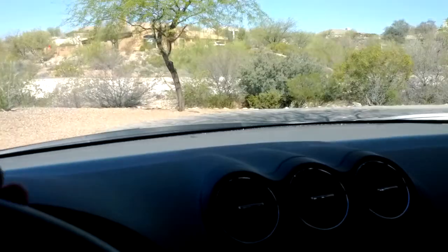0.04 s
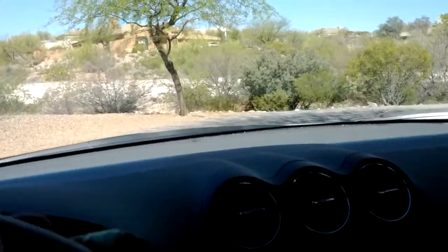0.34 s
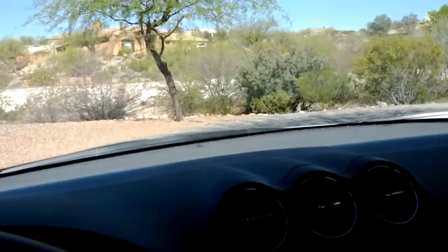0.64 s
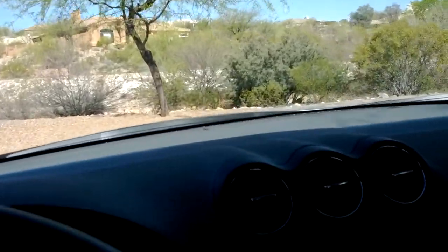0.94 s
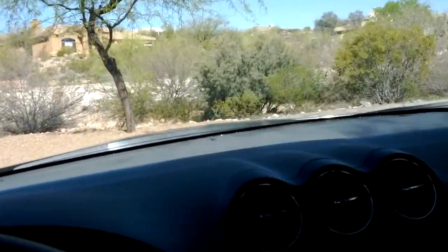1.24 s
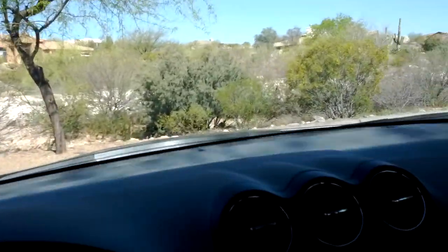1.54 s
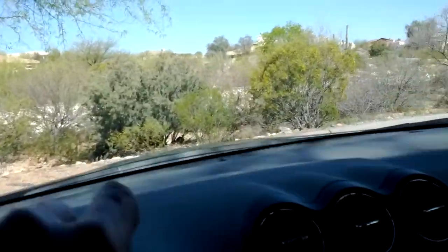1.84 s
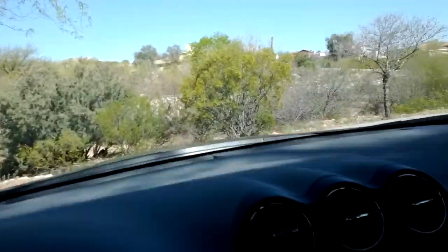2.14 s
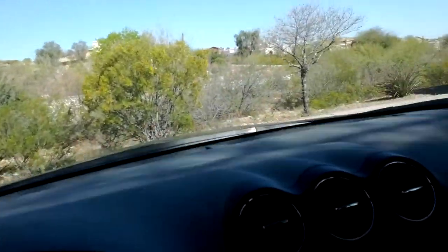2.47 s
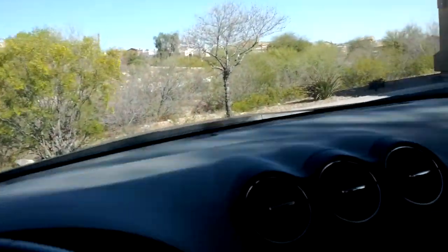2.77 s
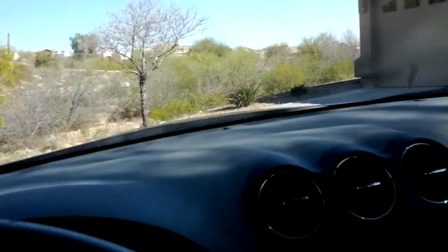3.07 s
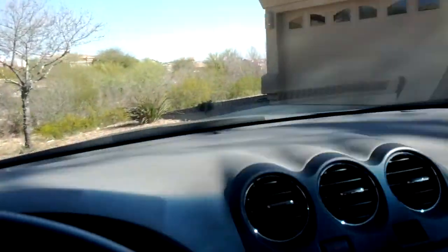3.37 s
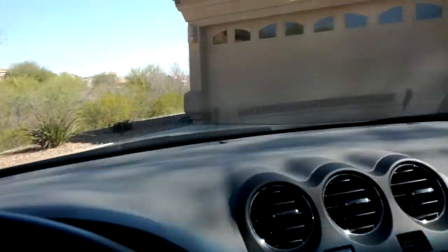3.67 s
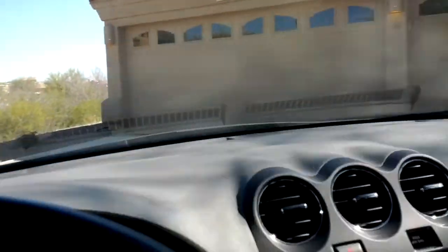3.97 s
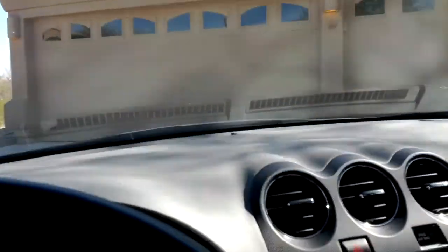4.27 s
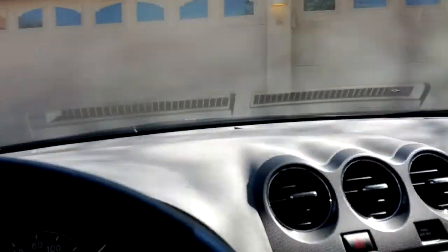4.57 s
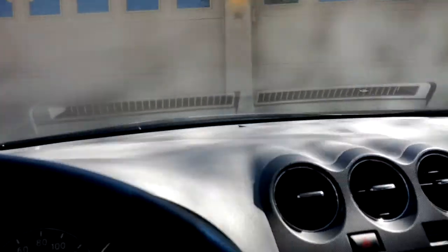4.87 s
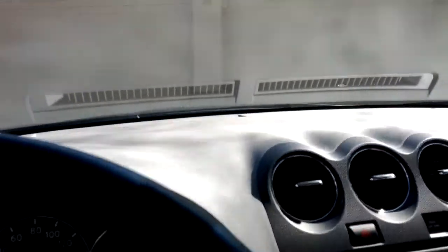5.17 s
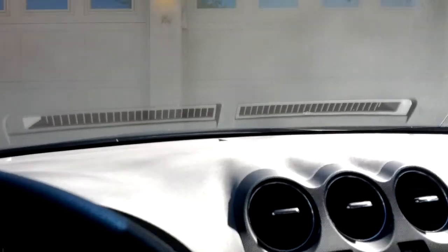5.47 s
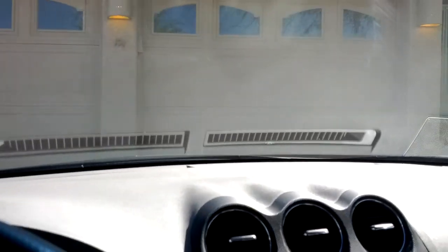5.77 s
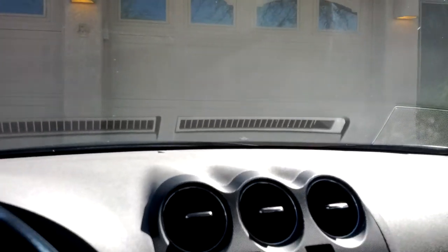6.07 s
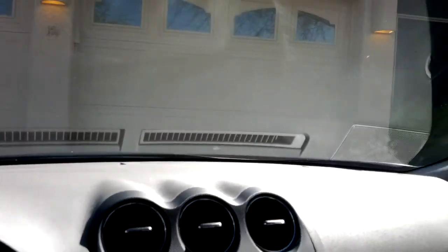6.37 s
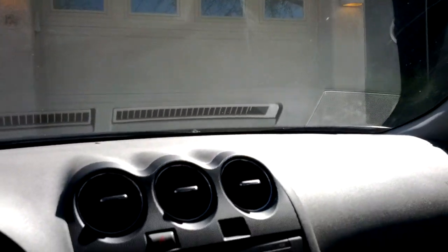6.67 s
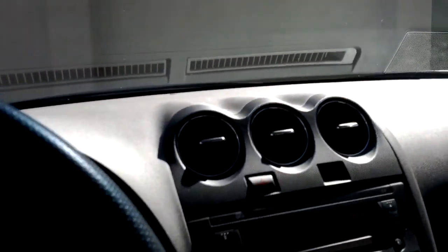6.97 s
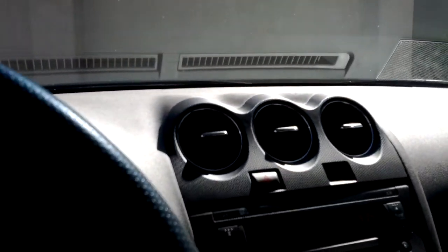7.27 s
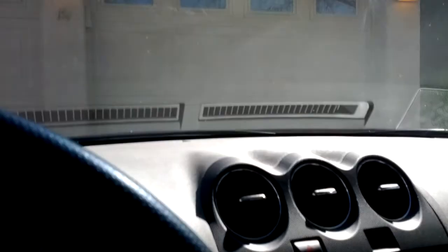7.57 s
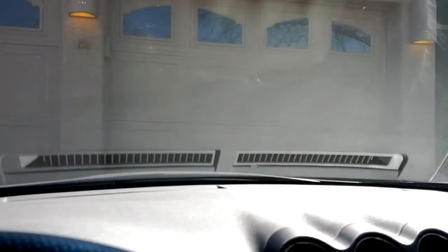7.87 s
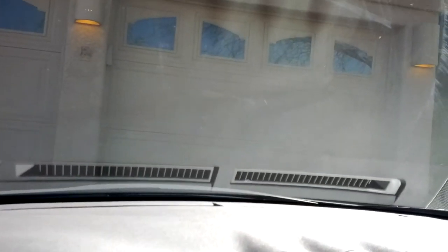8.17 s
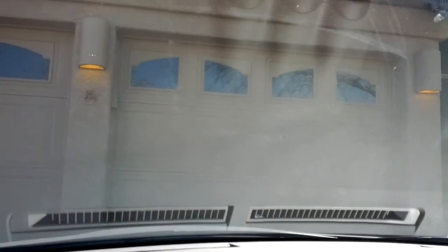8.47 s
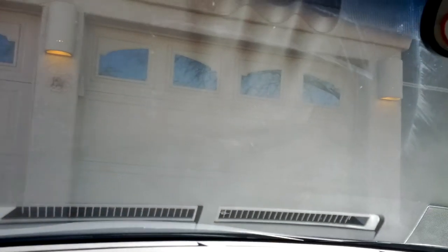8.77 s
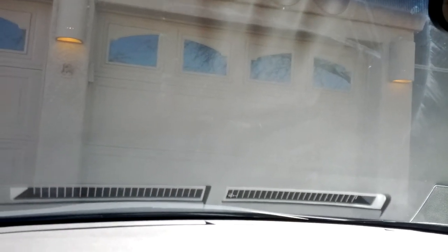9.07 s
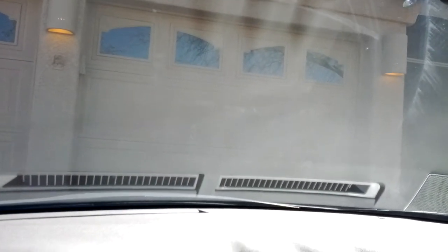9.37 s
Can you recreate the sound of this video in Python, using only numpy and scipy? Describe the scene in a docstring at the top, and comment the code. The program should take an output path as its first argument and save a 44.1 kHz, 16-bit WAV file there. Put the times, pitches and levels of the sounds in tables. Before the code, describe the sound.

A car engine drones inside the cabin and settles to idle, then a seat belt clicks and retracts and the parking brake ratchets.

```python
"""A four-cylinder engine drones and settles to idle, heard inside a car rolling up a driveway to a stop.
Its firing pulses boom in the cabin, tyres shake the body, the steering wheel rubs through a palm.
A seat belt clicks open and reels in until its steel tongue hits the pillar; the gear lever knocks the
trim and the parking brake's pawl ratchets up. Sleeves swish, and fingers shift on a hand-held phone."""
import sys
import numpy as np
from scipy import signal
from scipy.fft import rfft, irfft, next_fast_len
from scipy.io import wavfile
from scipy.ndimage import uniform_filter1d, map_coordinates

SR = 44100
rng = np.random.default_rng(int(sys.argv[2]) if len(sys.argv) > 2 else 0)


def store_wav(level_fs):
    """Save 16-bit WAV to argv[1]."""
    pcm = np.round(np.clip(np.atleast_2d(level_fs), -1, 1) * 32767)
    wavfile.write(sys.argv[1], SR, pcm.T.astype(np.int16))


N = 424241
T = np.arange(N) / SR

# engine pitch (time [s], firing rate [Hz])
FIRING = [(0, 28.07), (.6, 26.55), (1.15, 27.32), (1.65, 34.4), (1.95, 38.46), (2.3, 41.22), (2.8, 36.22),
          (3.12, 41.65), (3.7, 37.2), (4, 36.25), (4.55, 32.7), (5.1, 26.51), (5.8, 25.94), (6.7, 24.18),
          (7.4, 25.48), (8.4, 23.69), (8.8, 24.42), (9.62, 26.54)]
# the firing tone eases down to idle (time [s], level [dB])
DRONE = [(0, -30), (.25, -29.5), (.7, -36), (1, -32.5), (1.6, -31), (2.3, -31.5), (2.7, -32), (3.15, -35),
         (4, -32), (4.85, -36.5), (5.6, -36.5), (7.3, -38.5), (8.6, -40), (9.62, -43.5)]
# engine harmonics (multiple of the firing rate, gain [dB])
ORDERS = [(1, 2), (2, -7), (3, -14.5), (4, -17.5), (5, -33), (6, -24.5)]

# latch and trim clicks (time [s], snap [dB], plastic ring [dB], t60 [s])
CLICKS = [(0.048, -47, -75.5, 0.046), (.073, -48, -70, .015), (0.106, -45, -67, 0.019),
          (.122, -48, -70, .015), (.147, -41, -70, 0.016), (1.552, -42, -71, 0.13),
          (4.84, -52, -47.5, 0.12), (5.153, -67, -39.5, 0.042), (5.36, -27, -37, 0.11),
          (5.369, -22, -32, 0.067), (5.402, -42, -58, 0.065), (5.451, -32.5, -64, 0.077),
          (5.473, -53, -42.5, 0.3), (5.488, -15, -26.5, 0.084), (5.501, -44, -42, 0.12),
          (6.032, -38.5, -34, 0.028), (6.335, -56, -38.5, 0.027), (6.395, -38, -49, .06),
          (6.4325, -39, -35, 0.031), (6.456, -40, -63, 0.036), (6.823, -52, -56, 0.082),
          (7.016, -46.5, -59, 0.17), (7.3603, -26, -35, 0.022), (7.4078, -26, -23, 0.0029),
          (7.425, -38, -50, 0.14), (7.576, -42, -47, 0.16), (7.993, -40.5, -36.5, 0.05),
          (8.065, -45.5, -59, 0.14), (8.209, -31, -34, 0.032), (8.391, -31, -30, 0.097),
          (8.407, -24, -29, 0.039), (8.493, -54, -45.5, 0.13), (8.634, -38, -38.5, 0.079),
          (9.19, -57, -51, .05), (9.435, -50, -49.5, 0.12)]
# a click's bright edge (frequency [Hz], gain [dB])
SNAP_EQ = [(600, -4), (1500, -3.5), (3000, 0.5), (4800, 5), (6500, -2), (9000, 5), (13000, 2.5),
           (16000, -5.5)]
# buckle, plastic shell and belt guide loop (frequency [Hz], width [Hz], gain [dB])
BUCKLE_PEAKS = [(3020, 40, -6), (4860, 70, 2), (5240, 50, -3), (7860, 120, -5), (8182, 90, 1),
                (8807, 60, 3), (9590, 70, 4), (10474, 60, -3), (11120, 500, -4), (13460, 150, -4)]
PLASTIC_PEAKS = [(1133, 62, 10), (1280, 110, 3), (1560, 95, 1.5), (2258, 26, 1), (2605, 44, -2.5),
                 (2925, 120, -2.5)]
GUIDE_PEAKS = [(3200, 200, -9), (4340, 700, 3), (4840, 350, 1), (5700, 460, -5), (10100, 150, -5),
               (10800, 750, 0), (11600, 350, 1)]
# the belt's sprung latch and steel tongue (frequency [Hz], gain [dB], t60 [s])
LATCH_MODES = [(1144, 4, 0.1), (1744, -15, 0.07), (2050, -4.5, 0.064), (2960, -6, 0.1), (3340, -9, 0.06),
               (4151, -7, 0.07), (4850, 0, 0.055), (5216, -3, 0.06)]
TONGUE_MODES = [(3020, 6.5, 0.12), (3015, -3, 0.31), (4900, 0, 0.15), (5060, 5.5, 0.13), (5300, -9, .12),
                (5520, 7, 0.077), (5800, -3, .16), (7445, -12, 0.26)]
# hits that ring them (time [s], level [dB], share of free ring time)
LATCH_HITS = [(5.37, -29, 0.56), (5.49, -27.5, 1)]
TONGUE_HITS = [(5.493, -53, 0.71), (6.4328, -38, 0.17), (6.442, -47, 0.13), (6.455, -47.5, 0.96),
               (6.485, -55, 0.65), (6.549, -62, 0.93), (6.824, -54.5, 0.5), (6.833, -60, 0.47)]
# webbing running into its reel (time [s], level [dB])
REEL = [(5.51, -50), (5.66, -53), (5.83, -47), (5.98, -51.5), (6.1, -42.5), (6.19, -55.5), (6.28, -50),
        (6.31, -57), (6.41, -49), (6.46, -36)]
# the webbing's hiss (frequency [Hz], gain [dB])
WEBBING_EQ = [(530, -33.5), (900, -32), (1150, -11), (1510, -5), (1790, -2.5), (3590, -1), (4150, -1.5),
              (7140, -6.5), (10200, -5.5), (13800, -7.5), (16000, -15)]

# hits on pillar, console and gear lever
# (time [s], low thump [dB], mid body [dB], upper clack [dB], crack [dB], crack t60 [s])
KNOCKS = [(1.957, -43, -85, -27.5, -48.5, 0.077), (2.687, -24.5, -57, -38, -42, 0.058),
          (4.61, -57, -47, -36.5, -45.5, 0.05), (5.497, -78, -30, -52, -55, .05),
          (5.792, -57, -46, -41, -59, .025), (6.100, -27, -17.5, -43, -31.5, 0.053),
          (6.118, -30, -46, -45, -47, 0.071), (6.455, -32, -11.5, -9.5, -18, 0.051),
          (6.4656, -34, -30, -13.5, -34, .025), (6.485, -43, -40, -42, -52, .04),
          (6.522, -53, -40, -52, -43, 0.027), (6.549, -50, -47, -48, -40, 0.044),
          (6.723, -56, -50, -38.5, -52, 0.027), (6.844, -53, -43, -36, -37, 0.014),
          (6.982, -58, -46.5, -35.5, -45.5, 0.022), (7.226, -54, -43, -39, -38, 0.011),
          (7.3, -39, -30.5, -37, -34.5, 0.13), (7.359, -21, -15.5, -23.5, -28.5, 0.05),
          (7.377, -31.5, -34, -53, -58, 0.032), (7.443, -35, -37, -63, -56, .03),
          (7.486, -47, -34.5, -39, -49, 0.1), (7.513, -62, -42, -38, -41, 0.044),
          (7.526, -60, -38, -31, -42, 0.016), (7.5476, -34, -20, -19.5, -19.5, 0.011),
          (8.638, -31.5, -46, -65, -44, 0.054)]
# console and trim panels (frequency [Hz], gain [dB], t60 [s])
TRIM_MODES = [(104.6, 3.5, 0.17), (124, 2, 0.044), (178, 7.5, 0.083), (197, -6, 0.042), (235, 3, 0.042),
              (258, 5, 0.03), (308, -9, 0.081), (368.5, 3.5, 0.053), (475, -3, 0.067), (511, -3.5, 0.052),
              (575, 1, 0.024), (661, -1.5, 0.035), (755, -18, 0.028), (936, -9.5, 0.041), (1000, -9, 0.018),
              (1685, -10, 0.011)]
# a knock's noisy attack (frequency [Hz], gain [dB])
CRACK_EQ = [(500, 9), (900, 0), (1800, 4.5), (3000, -4.5), (4000, -3), (5500, -14.5), (7500, -24),
            (11000, -10), (16000, -30)]
# first contact of the hardest hits (time [s], peak [dB], contact [s])
SLAPS = [(6.4559, -11, 0.0005), (7.3612, -24, 0.00085), (7.5485, -15.5, 0.00022)]

# the brake pawl drops over each tooth (time [s], rasp [dB], clean ring [dB], ring pitch [Hz])
TEETH = [(8.139, -52, -51, 1200), (8.171, -38, -34.5, 1193), (8.199, -44, -38, 1227),
         (8.209, -43, -28.5, 1213), (8.215, -48, -30.5, 1240), (8.257, -38, -38, 1210),
         (8.266, -34, -31, 1190), (8.286, -33, -42, 1230), (8.3, -29, -36, 1030), (8.309, -32.5, -33, 1350),
         (8.355, -29.5, -30, 1290), (8.361, -34, -39, 1290), (8.376, -31.5, -30, 1270),
         (8.387, -30, -44, 1270), (8.398, -25, -29, 1030), (8.408, -28, -27.5, 1008),
         (8.42, -51, -40, 1300)]
# the pawl's rasp (frequency [Hz], width [Hz], gain [dB])
PAWL_PEAKS = [(980, 23, 7), (1250, 46, -5), (1370, 90, 1.5), (1450, 130, 0), (1980, 610, -2.5),
              (2650, 640, -4), (3530, 300, -3), (4540, 210, -29)]
# ratchet and pawl spring (frequency [Hz], gain [dB], t60 [s])
RATCHET_MODES = [(1040, -16, 0.074), (1242, 3, 0.058), (1290, -23, 0.041), (1534, -7.5, 0.039),
                 (2580, -16, .035), (3670, -15, .05), (4510, -7, 0.023), (4730, -20, 0.024)]
SPRING_MODES = [(1570, -3, .04), (4150, -7, .035), (4530, 1, 0.045), (4830, 2, .035), (5050, -8, .03)]
# the lever crunches as the cable goes taut (time [s], level [dB], rise [s], t60 [s])
CRUNCHES = [(8.303, -35.5, 0.017, .12), (8.383, -30.5, 0.0071, 0.095), (8.405, -29, 0.01, 0.053)]
# heaves of the lever in the floor tunnel, then of the seat (time [s], length [s], level [dB])
HEAVES = [(8.195, 0.236, -29.5), (8.485, 0.049, -34), (8.615, 0.098, -35.5)]
# lever crunch and tunnel rumble (frequency [Hz], gain [dB])
CRUNCH_EQ = [(150, -5), (350, 6), (520, -3), (720, 3), (1020, -11), (1200, -8), (2000, -13), (4000, -27),
             (8000, -40)]
TUNNEL_EQ = [(35, -22), (75, 1), (110, 2), (165, -1), (210, -7.5), (320, -10.5), (480, -29), (700, -33),
             (1200, -47)]

# the wheel slides through the palm (time [s], length [s], rub [dB], low ring [dB], high ring [dB])
SLIDES = [(0.283, 0.079, -66.5, -63, -90), (0.508, 0.052, -55, -67, -82), (0.555, 0.04, -46.5, -61, -84),
          (0.635, 0.32, -57.5, -60, -81), (0.88, 0.18, -72.5, -68, -83), (1.076, 0.1, -53, -65, -64),
          (1.165, 0.078, -52, -57, -58.5), (1.245, 0.35, -59, -72, -86), (1.595, .18, -59.5, -68, -89),
          (1.428, 0.03, -52, -55, -70), (1.897, 0.021, -58, -58, -64), (1.95, 0.024, -76, -41, -57),
          (2.024, 0.12, -56.5, -67, -73), (2.152, 0.044, -50.5, -58, -68), (2.189, 0.072, -42, -48.5, -62),
          (2.27, 0.062, -54, -50.5, -74), (2.345, 0.078, -47, -47.5, -55.5),
          (2.415, 0.073, -44.5, -44.5, -54), (2.49, 0.1, -43, -48, -53), (2.614, 0.023, -41, -54, -52),
          (2.662, 0.032, -42.5, -47, -54), (2.717, 0.057, -53, -53, -63), (3.098, 0.077, -65, -66, -76),
          (3.329, 0.027, -86, -56, -69), (3.456, 0.055, -58.5, -60, -61), (3.577, 0.093, -57.5, -58, -61.5),
          (3.931, 0.077, -79, -53, -57), (3.991, 0.29, -54.5, -51.5, -51), (4.196, 0.042, -43, -59, -48),
          (4.297, 0.19, -68, -64, -91)]
# the palm hops over the rim's stitching (time [s], level [dB])
HOPS = [(3.616, -62), (3.639, -54), (3.665, -49), (3.708, -46.5), (3.723, -48.5), (3.784, -51), (3.93, -55),
        (3.953, -51), (4, -43.5), (4.058, -42), (4.179, -42)]
# the tightest grips creak (time [s], length [s], slip rate [Hz], level [dB])
CREAKS = [(2.382, 0.063, 198, -47.5), (2.432, 0.031, 212.5, -38), (2.604, 0.072, 149.4, -44.5),
          (2.674, 0.034, 170, -42)]
# the wheel's ring under slides and creaks (frequency [Hz], width [Hz], gain [dB])
WHEEL_LOW_PEAKS = [(458, 86, -14), (657, 28, 2.5)]
WHEEL_HIGH_PEAKS = [(996, 46, 5.5), (1470.7, 190, -5.5), (1800, 200, 0), (2730, 590, 5)]
CREAK_PEAKS = [(496, 42, 4), (656, 36, 7), (1240, 380, -8), (1900, 240, -15)]
# sleeve moves (time [s], length [s], hiss [dB], dull rustle [dB])
SWISHES = [(.06, 0.082, -77, -66), (0.656, 0.28, -56.5, -59), (2.795, 0.21, -45.5, -59),
           (4.603, 0.22, -47, -63), (4.783, 0.12, -49, -70), (4.737, 0.71, -60, -89),
           (6.252, 0.045, -45, -65), (6.41, 0.26, -61, -50.5), (6.544, 0.32, -64.5, -79),
           (6.39, 2.4, -66.5, -68), (7.265, 0.25, -54, -51), (7.452, 0.083, -57, -46.5),
           (8.079, 0.22, -58.5, -57), (8.458, 0.5, -52.5, -47.5), (8.758, 0.21, -49, -49.5),
           (8.9, 0.25, -55.5, -50.5), (8.781, 1.44, -65, -57.5)]
# fingers shift on the phone (time [s], level [dB], rise [s], t60 [s])
GRASPS = [(9.551, -37, 0.0047, 0.2), (9.575, -25.5, 0.0025, 0.06), (9.6, -24.5, 0.0092, 0.13)]
# friction of rim, sleeve and fingers (frequency [Hz], gain [dB])
RIM_EQ = [(300, -12), (600, 8), (1200, 0.5), (2000, -3), (3500, 0), (5200, 2.5), (6500, -13),
          (10000, -13.5), (16000, -19)]
CLOTH_EQ = [(1000, -5), (3000, 2), (5000, 1), (7000, -6), (10000, 2.5), (13000, 3), (16000, -6)]
FINGER_EQ = [(80, -8), (200, 1), (380, 2), (650, -6.5), (900, -6.5), (1400, -8.5), (2500, -16),
             (5000, -19.5), (7000, -27), (11000, -17), (16000, -28)]
# flickering bands of skin and cloth (frequency [Hz])
GRAIN_BANDS = [2400, 3500, 4900, 10500]

# soft jolts of car body and hand (time [s], pitch [Hz], level [dB], rise [s], t60 [s])
JOLTS = [(.1, 42.1, -17, 0.026, 1), (.17, 128.7, -28.5, 0.068, 0.35), (.85, 124.1, -31, 0.052, 0.72),
         (.99, 130, -34, 0.014, .4), (1.17, 108, -31, 0.042, 0.38), (1.55, 107, -36, 0.038, .5),
         (2.2, 192.8, -37, .025, .15), (2.775, 182, -32.5, 0.0096, 0.13), (.9, 82.5, -47, 0.075, 0.6),
         (2.47, 68, -26, .025, 0.15), (2.776, 91.4, -14, 0.0188, 0.23), (5.505, 118, -25, 0.021, 0.3),
         (7.358, 65.7, -11.5, 0.0028, 0.076), (8.388, 148, -17, 0.019, 0.05),
         (8.68, 151.4, -31.5, 0.013, 0.31)]
# swells and dips in the low rumble while the car rolls (centre time [s], half width [s], gain [dB])
RUMBLE_SWINGS = [(.2, 0.075, 8.5), (1.01, 0.1, 8), (1.58, 0.023, 6), (1.8, 0.072, 5.5), (1.91, 0.018, 3.5),
                 (2.05, .035, 0), (2.25, 0.05, 1), (2.51, 0.047, 4), (2.77, 0.21, 5.5), (3.1, .04, -2),
                 (3.25, 0.027, 6.5), (3.39, 0.049, 8.5), (3.69, 0.026, 7.5), (3.97, .04, 2.5)]
# fader ride for the body's boom (time [s], level [dB])
BOOM_RIDE = [(0, -45), (1.4, -44), (2.6, -43.5), (3.2, -47), (4.4, -46.5), (4.85, -53), (5.3, -49),
             (9.62, -51)]
# a faint high hiss, quieter until it rises near 4.6 s (time [s], level [dB])
HISS_RIDE = [(0, -79), (4.4, -80), (4.9, -68.5), (9.62, -75.5)]
# low, middle and top of the cabin bed (frequency [Hz], gain [dB])
BOOM_EQ = [(15, 4), (28, 7.5), (42, 8.5), (58, 4), (85, 4), (112, 10), (138, 2), (175, -9), (240, -18),
           (400, -76)]
ROAR_EQ = [(100, -31.5), (200, 2), (300, 3.5), (420, -1), (670, -1), (900, -8), (1400, -12.5),
           (2200, -22.5), (5000, -30), (9000, -95)]
HISS_EQ = [(800, 15), (2000, -19), (4000, -6), (5500, -45), (7000, -32), (10000, 14), (13000, 12.5),
           (16000, 5)]


def engine():
    """Firing harmonics boom in the cabin and beat against the swaying body; the cooling fan hums along."""
    sway_hz, fan_hz = 30.9, 133
    rolling = np.interp(T, [4.3, 5.1], [1, 0])
    phase = phase_of(curve(FIRING) * (1 + .0074 * walk(10)))
    phase += .31 * rolling * walk(20)  # under way the drone stumbles with the shaking body
    stumble_db = rolling * (3.5 * np.tanh(walk(13)) - 3)
    drone_db = curve(DRONE) + rumble_swing() + stumble_db
    upper_db = -37.5 + .064 * (drone_db + 35)  # upper harmonics barely follow the load
    drone = np.zeros(N)
    for order, db in ORDERS:
        ride_db = drone_db if order == 1 else upper_db + 4.5 * walk(18)
        drone += undb(ride_db + db) * np.sin(order * phase + rng.uniform(0, 2 * np.pi))
    sway = undb(-36) * rolling * np.sin(phase_of(sway_hz * (1 + .047 * walk(6))))
    fan = undb(-53.5 + 2 * walk(2.2)) * np.sin(phase_of(fan_hz + .56 * walk(3.324)))
    return np.sqrt(2) * (undb(-1.5) * drone + sway + fan)


def latches():
    """Chattering contacts ring buckle and plastic; the latch springs open and the tongue chinks."""
    rise_share = .021  # a longer click also builds more slowly
    chatter = bursts([(s, db, rise_share * t60, t60) for s, db, _, t60 in CLICKS])
    chatter *= colour(slips(rate=16000, spread_db=-2), SNAP_EQ)
    buckle = resonate(chatter, BUCKLE_PEAKS) * chatter.std() * undb(-13.5)
    shell = bursts([(s, db, rise_share * t60, t60) for s, _, db, t60 in CLICKS])
    shell *= resonate(noise(), PLASTIC_PEAKS)
    latch = ring(LATCH_MODES, [(*hit, 1) for hit in LATCH_HITS], detune=.0026)
    tongue = ring(TONGUE_MODES, [(*hit, 1) for hit in TONGUE_HITS], detune=.0018)
    return undb(-3.5) * chatter + buckle + shell + latch + tongue


def belt_webbing():
    """Webbing hisses and flutters through its guide loop as it reels in."""
    weave = slips(rate=7000, spread_db=.5) * snags(depth=.6)
    hiss = colour(weave, WEBBING_EQ) + undb(-9) * resonate(weave, GUIDE_PEAKS)
    return hiss * swell(REEL) * undb(-1.5 + .8 * walk(45))


def knocks():
    """Knocks ring the trim: soft ones its low modes, hard ones the high modes and a crack."""
    out, t = np.zeros(N), T[:SR // 4]
    hz, mode_db, t60 = np.transpose(TRIM_MODES)
    rings = np.sin(2 * np.pi * hz[:, None] * t) * fade(t, t60[:, None])
    rings *= (-1) ** (np.arange(len(hz))[:, None] // 2)  # panels swing in opposite senses
    for start, thump_db, body_db, clack_db, *_ in KNOCKS:
        hit_db = np.interp(np.log(hz), np.log([130, 300, 700]), [thump_db, body_db, clack_db])
        add(out, start, undb(mode_db + hit_db) @ rings)
    crack = bursts([(s, db, .0008, decay) for s, *_, db, decay in KNOCKS])
    return out + crack * colour(noise(), CRACK_EQ)


def slaps():
    """The hardest hits shove the panel: one swing of pressure, sharper for a shorter contact."""
    out = np.zeros(N)
    for centre, db, contact in SLAPS:
        offset = T[:SR // 100] / contact - 4
        add(out, centre - 4 * contact, undb(db) * offset * np.exp((1 - offset ** 2) / 2))
    return out


def loose_trim():
    """Loose panels buzz on briefly after each knock."""
    buzz_eq = [(60, 2), (160, 19), (330, 10), (600, -11), (1000, -27), (1800, -44), (4000, -32)]
    shake = bursts([(s, body_db, .008, .1) for s, _, body_db, *_ in KNOCKS])
    return shake * colour(noise(), buzz_eq) * undb(-6.5)


def parking_brake():
    """The pawl grinds and rings over each tooth; under load the lever crunches and the floor rumbles."""
    rasp_eq = [(500, 9.5), (1000, -3.5), (4300, -.5), (5700, -6.5), (12000, 4)]
    drops = bursts([(s, db, .003, .062) for s, db, *_ in TEETH])
    drag = arches([(8.2, .19, -44)])  # the pawl drags between teeth
    scrape = colour(slips(rate=9000, spread_db=-1), rasp_eq)
    rasp = np.hypot(drops, drag) * resonate(scrape, PAWL_PEAKS)
    main_hz = RATCHET_MODES[1][0]
    ratchet = ring(RATCHET_MODES, [(s, db, 1, hz / main_hz) for s, _, db, hz in TEETH], detune=.015)
    crunch = bursts(CRUNCHES) * colour(slips(rate=1300, spread_db=4), CRUNCH_EQ)
    spring = ring(SPRING_MODES, [(8.2095, -30.5, 1, 1)], detune=.01)  # snaps home once
    rumble = strokes(HEAVES) * colour(noise(), TUNNEL_EQ)
    return rasp + ratchet + spring + crunch + rumble


def steering_wheel():
    """The drag of the palm keeps the hollow wheel ringing through each slide."""
    low_eq = [(250, -21), (450, 3.5), (720, -4.5), (1100, -39), (2500, -40)]
    high_eq = [(500, -1), (850, 11.5), (2600, -4.5), (5000, -10)]
    low = resonate(colour(noise(), low_eq), WHEEL_LOW_PEAKS)
    high = resonate(colour(noise(), high_eq), WHEEL_HIGH_PEAKS)
    low = drift(low, share=.025, rate=14)  # the ring wanders as the grip shifts
    low *= strokes([(s, length, db) for s, length, _, db, _ in SLIDES])
    high *= strokes([(s, length, db) for s, length, _, _, db in SLIDES])
    return low + high


def creaks():
    """Skin sticks and slips at a pitch that arches with the pressure, ringing the wheel."""
    out = np.zeros(N)
    for start, length, hz, db in CREAKS:
        press = np.sin(np.pi * np.clip((T - start) / length, 0, 1))
        cycles = np.cumsum(hz * (1 + .06 * press + .04 * walk(150))) / SR
        pulses = np.diff(np.floor(cycles), prepend=0)
        out += undb(db) * press * resonate(pulses, CREAK_PEAKS)
    return out


def palm_rub(grip):
    """The palm presses unevenly on the rim and hops over its stitching: fine slips with coarse grit."""
    slide = strokes([(s, length, db) for s, length, db, *_ in SLIDES]) * grip
    slide *= undb(-2 + 1.7 * walk(22.07))
    hops = bursts([(s, db, .0014, .026) for s, db in HOPS])
    fine = unit(slips(rate=2700, spread_db=-.5))
    grit = undb(-8) * unit(slips(rate=350, spread_db=1))
    return colour(fine + grit, RIM_EQ) * np.hypot(slide, hops)


def sleeve(cuff):
    """Cloth hisses at the cuff and swishes over the seat as the arm moves."""
    swish = arches([(s, length, db) for s, length, db, _ in SWISHES]) * snags(depth=.44)
    return colour(slips(rate=6300, spread_db=-5.5), CLOTH_EQ) * np.hypot(cuff, swish)


def dull_rustle(cuff):
    """The soft underlayer of sleeve and cuff, and the whirr of the belt spool."""
    arm = arches([(s, length, db) for s, length, _, db in SWISHES])
    spool = undb(-4) * swell(REEL)
    return colour(noise(), ROAR_EQ) * (arm + spool + undb(-3.5) * cuff)


def fingers():
    """Fingertips scuff the phone's case."""
    return colour(slips(rate=6000, spread_db=-1), FINGER_EQ) * bursts(GRASPS)


def rubbing():
    """The friction bus: palm, sleeve, belt and fingers."""
    grip = undb(3.5 * np.tanh(.6 * walk(55) + .6 * walk(250)))  # skin sticks and lets go
    grip *= snags(depth=1.3)
    # the cuff follows each slide, growing less than the rub
    cuff = strokes([(s, length, -31.5 + .53 * db) for s, length, db, *_ in SLIDES]) * grip
    skin_and_cloth = palm_rub(grip) + sleeve(cuff)
    return belt_webbing() + dull_rustle(cuff) + fingers() + flicker(skin_and_cloth)


def jolts():
    """Each jolt sets a panel wobbling around its own pitch."""
    out, t = np.zeros(N), T[:SR // 2]
    wander = walk(70)
    for k, (start, hz, db, rise, t60) in enumerate(JOLTS):
        wobble = np.roll(wander, -k * len(t))[:len(t)]
        tone = np.sin(phase_of(hz * (1 + .094 * wobble)))
        add(out, start, undb(db) * strike(t, rise, t60) * tone)
    return out


def rumble_swing():
    """Brief swells and dips, in dB, of drone and boom while the car rolls."""
    return sum(db * np.exp(-((T - centre) / width) ** 2) for centre, width, db in RUMBLE_SWINGS)


def cabin():
    """Tyres, then just the idling engine, shake the body under a dull roar and a faint high hiss."""
    boom = colour(noise(), BOOM_EQ) * undb(curve(BOOM_RIDE) + rumble_swing() + 7)
    roar = colour(noise(), ROAR_EQ) * undb(-55 + .73 * walk(11))
    hiss = colour(noise(), HISS_EQ) * undb(curve(HISS_RIDE))
    return boom + roar + hiss


def reflections(x, t60, first_s):
    """Dense short echoes off glass and dashboard, as strong as x."""
    t = T[:SR // 4]
    echo = rng.standard_normal(len(t)) * fade(t, t60) * (t > first_s)
    return signal.fftconvolve(x, echo / np.linalg.norm(echo))[:N]


def ring(modes, hits, detune):
    """Strike modes, slightly detuned per hit (time [s], level [dB], share of ring time, pitch ratio)."""
    out, t = np.zeros(N), T[:SR // 2]
    detunings = 1 + detune * rng.uniform(-1, 1, (len(hits), len(modes)))
    for (start, db, share, ratio), shifts in zip(hits, detunings):
        for (hz, mode_db, t60), shift in zip(modes, shifts):
            tone = np.sin(2 * np.pi * hz * ratio * shift * t)
            add(out, start, undb(db + mode_db) * fade(t, t60 * share) * tone)
    return out


def slips(rate, spread_db):
    """Friction: dense tiny slips of unequal size."""
    return (rng.random(N) < rate / SR) * noise() * undb(spread_db * np.minimum(rng.exponential(size=N), 4))


def snags(depth, rate=55):
    """Gain of a sliding contact that catches at random: little scrapes over a steady drag."""
    catches = (rng.random(N) < rate / SR) * rng.uniform(.3, 1, N)
    return unit(1 + depth * signal.fftconvolve(catches, fade(T[:SR // 10], t60=.03))[:N])


def flicker(x):
    """A rubbing contact keeps changing, so each band of its hiss comes and goes on its own."""
    return x + sum(.45 * walk(28) * signal.lfilter(*signal.iirpeak(hz, 3, SR), x) for hz in GRAIN_BANDS)


def drift(x, share, rate):
    """Let the pitch of a ring wander by a share of itself."""
    return map_coordinates(x, [np.cumsum(1 + share * walk(rate))], order=1, mode="mirror")


def strokes(rows):
    """Envelope of strokes that swell, press harder and let go (time [s], length [s], level [dB])."""
    power, t = np.zeros(N), T[:SR]
    lead_s = .013  # the sound starts just before the full grip
    for start, length, db in rows:
        push_db = .5 * (np.minimum(t / length, 1) - .5)
        attack = np.minimum(t / (2 * lead_s + .14 * min(length, .12)), 1)
        release = fade(np.maximum(t - length - lead_s, 0), t60=.12)
        shape = np.sin(np.pi / 2 * attack) ** 2 * release
        add(power, start - lead_s, (undb(db + push_db) * shape) ** 2)
    return np.sqrt(power)


def arches(rows):
    """Envelope of moves that swell and die evenly (time [s], length [s], level [dB])."""
    power = np.zeros(N)
    for start, length, db in rows:
        add(power, start, (undb(db) * np.sin(np.pi * T[T < length] / length) ** 2) ** 2)
    return np.sqrt(power)


def bursts(rows):
    """Envelope of hits (time [s], level [dB], rise [s], t60 [s])."""
    power, t = np.zeros(N), T[:SR // 2]
    for start, db, rise, t60 in rows:
        add(power, start, (undb(db) * strike(t, rise, t60)) ** 2)
    return np.sqrt(power)


def strike(t, rise, t60):
    """Linear attack, exponential tail."""
    return np.minimum(t / rise, 1) * fade(np.maximum(t - rise, 0), t60)


def fade(t, t60):
    """Decay by 60 dB every t60 seconds."""
    return np.exp(-np.log(1000) * t / t60)


def swell(rows):
    """Gain from (time [s], level [dB]) points, silent outside them."""
    gate = 1. * ((T >= rows[0][0]) & (T <= rows[-1][0]))
    return undb(curve(rows)) * uniform_filter1d(gate, size=400)


def curve(rows):
    """Straight lines through (time [s], value) points."""
    return np.interp(T, *np.transpose(rows))


def walk(rate):
    """Glide to a new random value rate times a second, at rms 1."""
    hold = max(int(SR / rate), 1)
    steps = np.repeat(rng.standard_normal(N // hold + 1), hold)
    return unit(uniform_filter1d(steps, hold)[:N])


def colour(x, points):
    """EQ x through (frequency [Hz], gain [dB]) points, at rms 1."""
    hz, db = np.transpose(points)
    size = next_fast_len(N, real=True)
    bins_hz = np.maximum(np.fft.rfftfreq(size, 1 / SR), 1)
    gain = undb(np.interp(np.log(bins_hz), np.log(hz), db))
    return unit(irfft(rfft(x, size) * gain, size)[:N])


def resonate(x, peaks):
    """Pass x through resonances (frequency [Hz], width [Hz], gain [dB]), at rms 1."""
    return unit(sum(undb(db) * signal.lfilter(*signal.iirpeak(hz, hz / width, SR), x)
                    for hz, width, db in peaks))


def phase_of(hz):
    """Running phase of a gliding pitch."""
    return 2 * np.pi * np.cumsum(hz) / SR


def noise():
    """White noise."""
    return rng.standard_normal(N)


def add(out, start, sound):
    """Mix a sound in at a time."""
    i = max(int(start * SR), 0)
    out[i:i + len(sound)] += sound[:max(N - i, 0)]


def undb(db):
    """Decibels to gain."""
    return 10 ** (np.asarray(db) / 20)


def unit(x):
    """Scale to rms 1."""
    return x / np.sqrt(np.mean(x ** 2))


def scene():
    """The mono mix; the padded cabin adds only short echoes to hits and friction."""
    hits = knocks() + slaps() + loose_trim() + latches() + parking_brake()
    hits += undb(-27) * reflections(hits, t60=.23, first_s=.00444)
    rub = rubbing()
    rub = undb(-.5) * rub + undb(-9) * reflections(rub, t60=.05, first_s=.002)
    return (engine() + cabin() + jolts() + steering_wheel() + creaks() + rub + hits)[None]


def record(dry):
    """The phone rounds the loudest peaks and cuts the top above 16 kHz."""
    return signal.sosfilt(signal.ellip(8, .2, 70, 16000, fs=SR, output="sos"), np.tanh(dry))


dry = scene()
out = record(dry)
store_wav(out)
```